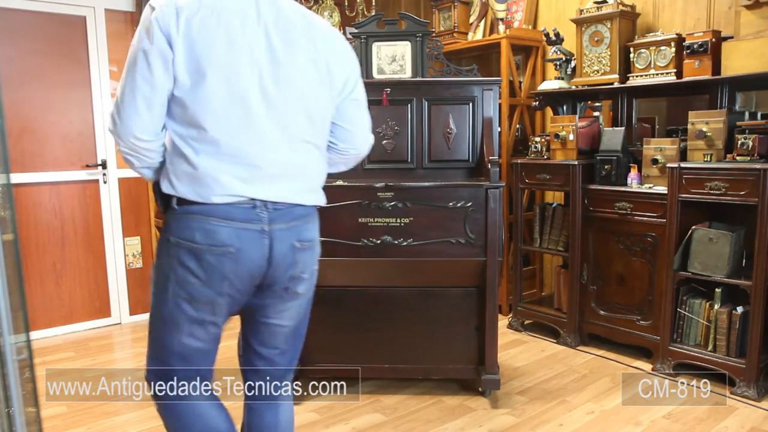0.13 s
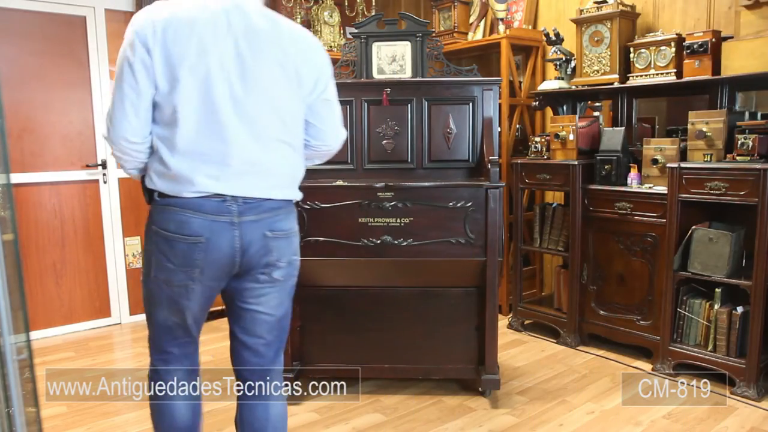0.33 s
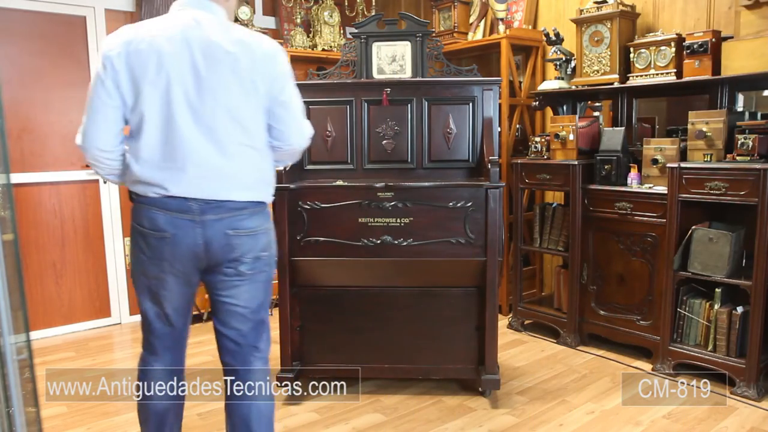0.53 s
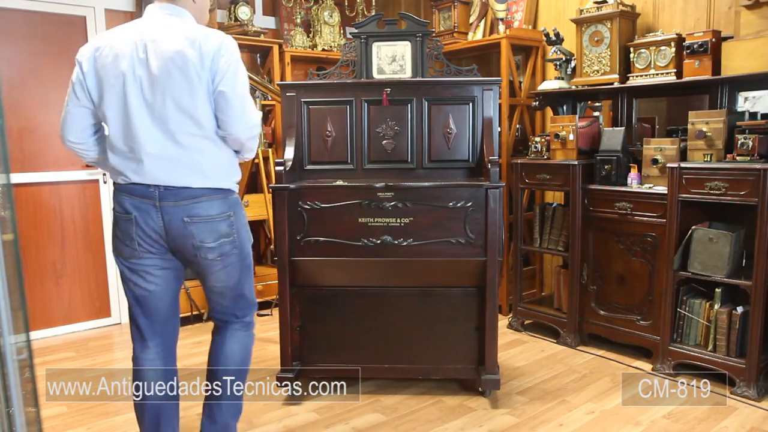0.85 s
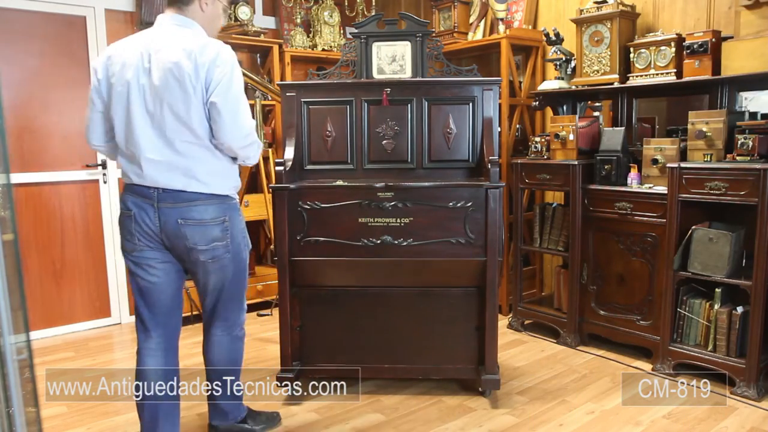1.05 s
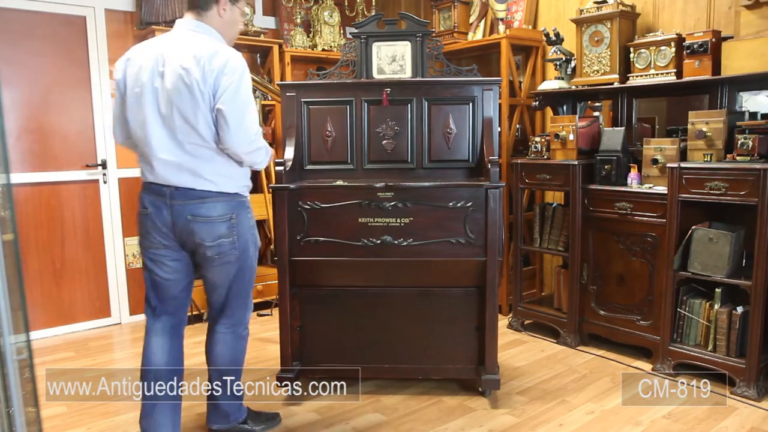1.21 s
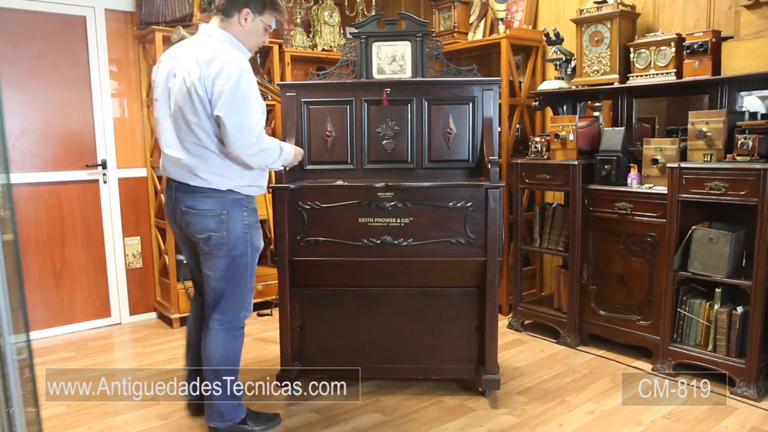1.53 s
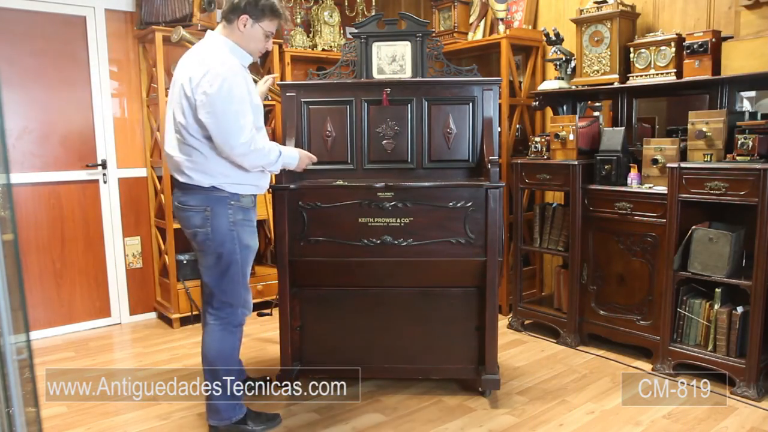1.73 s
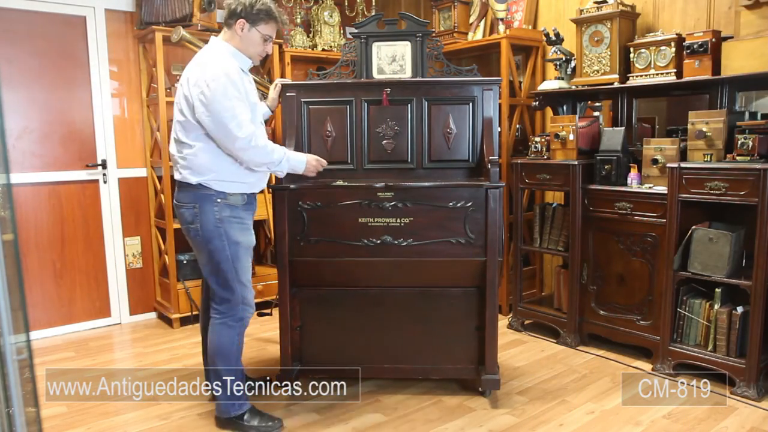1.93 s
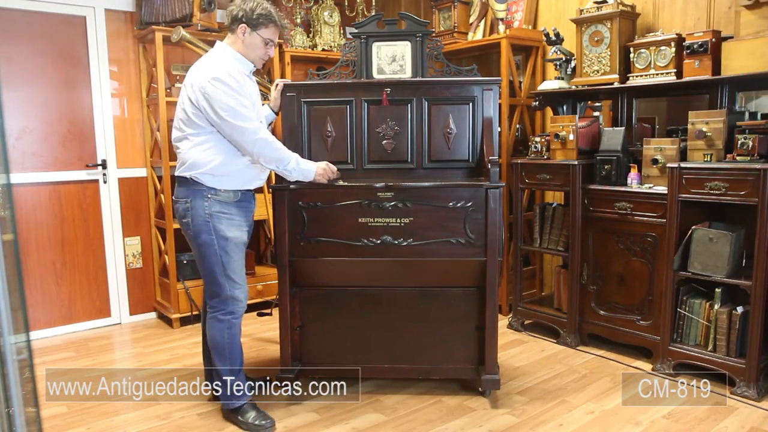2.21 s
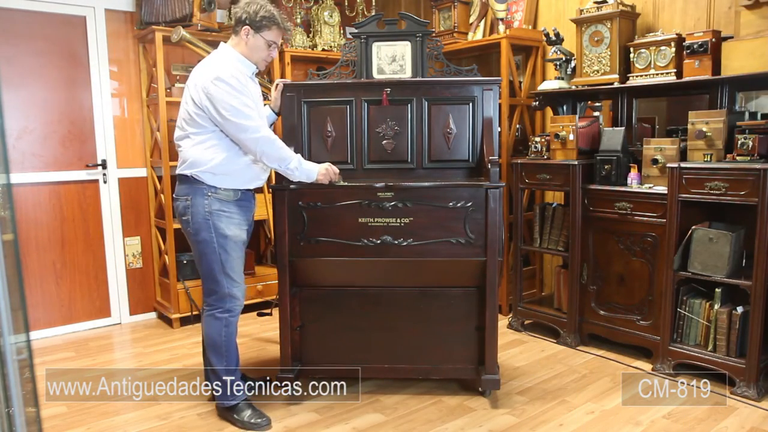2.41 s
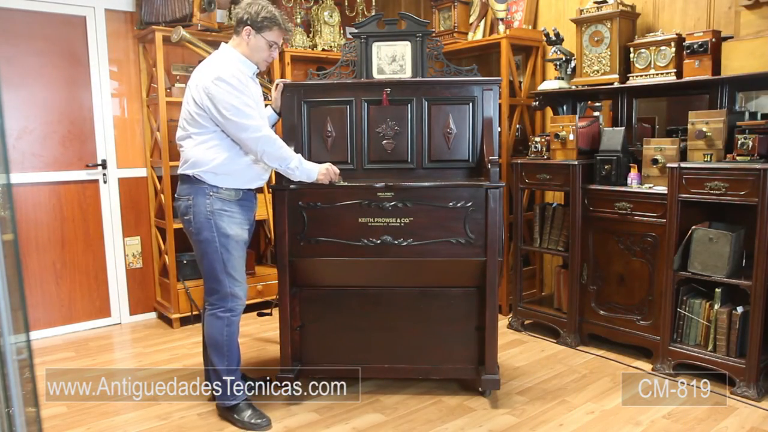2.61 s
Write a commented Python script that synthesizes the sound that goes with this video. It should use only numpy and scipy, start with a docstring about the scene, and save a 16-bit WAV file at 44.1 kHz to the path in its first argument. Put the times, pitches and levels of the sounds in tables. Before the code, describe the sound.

Footsteps on a wooden floor with soft scuffs, then a sharp hand knock on a wooden cabinet

```python
"""A man takes a few soft steps over a wooden floor in a small live room: decaying sines make the thuds,
coloured noise the clacks, scuffs and ticks; a board groans as low modes ring at each slip.
A thin, faint whistle, a narrow noise band, wavers during the first steps. Then his hand knocks on a wooden
cabinet, noise cracks over ringing panels, and something loose in it rattles.
One microphone with a steady noise hiss picks it all up; peaks above full scale clip."""
import sys
import numpy as np
from scipy import signal
from scipy.fft import rfft, irfft, next_fast_len
from scipy.io import wavfile
from scipy.ndimage import map_coordinates

SR = 44100
rng = np.random.default_rng(int(sys.argv[2]) if len(sys.argv) > 2 else 0)


def dump(signal):
    """Clip the signal to [-1, 1] and save it as 16-bit WAV at the path in sys.argv[1]."""
    limited = np.clip(np.atleast_2d(signal).T, -1, 1)
    pcm = np.round(limited * 32767).astype(np.int16)
    wavfile.write(sys.argv[1], SR, pcm)


N = 121275


def amp(db):
    """Decibels to gain."""
    return 10 ** (np.asarray(db) / 20)


def unit(x):
    """Scaled to rms 1."""
    return x / np.sqrt(np.mean(x ** 2) + 1e-20)


def along(points, hz):
    """(Hz, value) points interpolated on a log frequency axis."""
    point_hz, value = np.transpose(points)
    return np.interp(np.log(hz + 1), np.log(point_hz + 1), value)


def since(start_s):
    """Seconds since a moment, zero before it."""
    return np.maximum(np.arange(N) / SR - start_s, 0)


def wobble(knots_per_s):
    """Smooth random curve through normally distributed knots."""
    knots = rng.standard_normal(N // 8)
    return map_coordinates(knots, [np.arange(N) * knots_per_s / SR], mode="wrap")


def filtered(x, response):
    """x times a response of frequency."""
    size = next_fast_len(N + SR // 4)
    return irfft(rfft(x, size) * response(np.fft.rfftfreq(size, 1 / SR)), size)[:N]


def noise(colour_db):
    """Noise of rms 1 with a spectrum given in dB."""
    return unit(filtered(rng.standard_normal(N), lambda hz: amp(colour_db(hz))))


def shelf(hz, corner_hz):
    """Rises from 0 to 1 around the corner."""
    return hz ** 4 / (hz ** 4 + corner_hz ** 4)


def struck(t, t60_s, attack_s=0.00027):
    """Quick rise and exponential decay, 60 dB per t60."""
    decay = np.exp(-np.minimum(np.log(1000) * t / t60_s, 40))
    return (1 - np.exp(-t / attack_s)) * decay


def ring(modes, start_s, scatter_db):
    """Damped modes set going at one moment, levels scattered, cut after half a second."""
    t = since(start_s)
    first = np.searchsorted(t, 0, side="right")
    t = t[first:first + SR // 2]
    out = np.zeros(N)
    for pitch_hz, level_db, t60_s in modes:
        gain = amp(level_db + scatter_db * rng.standard_normal())
        out[first:first + len(t)] += gain * struck(t, t60_s) * np.sin(2 * np.pi * pitch_hz * t)
    return out


ROOM_RISE_S = 0.0041
# reverberation: freq_hz [Hz], t60_s [s]
ROOM_DECAY = [(80, 1), (250, 0.24), (500, 0.44), (1500, 0.66), (3500, 0.62), (6000, 0.46), (12000, 0.33)]


def room(x, wet_db):
    """Adds reverberation: noise decaying at its own rate per frequency, after a soft onset."""
    hz, t, spectrum = signal.stft(rng.standard_normal(SR), SR, nperseg=256)
    decay = np.exp(-np.log(1000) * t / along(ROOM_DECAY, hz)[:, None])
    tail = signal.istft(spectrum * decay, SR, nperseg=256)[1]
    tail *= 1 - np.exp(-(np.arange(len(tail)) / SR / ROOM_RISE_S) ** 2)
    return x + amp(wet_db) * signal.fftconvolve(x, tail / np.linalg.norm(tail))[:N]


# heel and sole pressing on boards: start_s [s], level_db [dB], pitch_hz [Hz], half_peak_s [s, half time to peak]
THUD_EVENTS = [(0.0, -27, 487, 0.0019), (0.061, -32.5, 409, 0.0034), (0.226, -19, 623, 0.0059),
               (0.226, -23, 323, 0.0064), (0.247, -17, 617, 0.0022), (0.300, -31, 367, 0.0032),
               (0.334, -6, 487, 0.0022), (0.340, -10, 280, 0.0015), (0.343, -13, 740, 0.0019),
               (0.525, -22, 334, 0.0029), (0.672, -29, 450, 0.0025), (0.879, -21, 510, .002),
               (0.889, -21.5, 763, 0.0022), (0.907, -24, 446, 0.0038), (0.958, -24, 430, 0.0029),
               (0.991, -28.5, 421, 0.0041), (1.070, -27, 440, 0.0026), (1.458, -15.5, 429, 0.0016),
               (1.459, -27.5, 216, 0.0036), (1.48, -18.5, 468, 0.0023), (1.507, -16, 425, 0.0014),
               (1.531, -19.5, 440, 0.0067), (1.568, -24, 437, 0.0054), (1.594, -4, 447, 0.0012),
               (1.609, -10.5, 375, 0.0013), (1.624, -15, 465, .003), (1.928, -23, 507, .003),
               (1.929, -23.5, 822, 0.0019), (2.25, -30, 464, 0.01)]


def thuds():
    """Each soft landing swells and dies within a few cycles of the boards' pitch."""
    out = np.zeros(N + SR)
    t = np.arange(SR // 10) / SR
    for start_s, level_db, pitch_hz, half_peak_s in THUD_EVENTS:
        u = t / (2 * half_peak_s)
        swell = (u * np.exp(1 - u)) ** 2
        first = max(round(start_s * SR), 0)
        out[first:first + len(t)] += amp(level_db) * swell * np.sin(2 * np.pi * pitch_hz * t)
    return room(out[:N], wet_db=-4.5)


CLACK_T60_S, CLACK_TREBLE_HZ = 0.057, 1520
# shoe meeting floor: start_s [s], level_db [dB], treble_db [dB]
CLACK_EVENTS = [(0.0, -25.5, -4.5), (0.2237, -15.5, -4), (0.8671, -20, -8), (1.0725, -20, -3),
                (2.017, -22, 0.5)]
# clack spectrum: freq_hz [Hz], level_db [dB]
CLACK_SPECTRUM = [(50, -31), (120, -34), (200, -1.5), (400, -3), (750, 4.5), (1000, -12.5), (1250, -1.5),
                  (1700, -4.5), (3200, -2.5), (4500, -12.5), (15000, -58)]


def clacks():
    """The hard edge of a heel gives a short, broad, woody clack: decaying coloured noise."""
    out = np.zeros(N)
    for start_s, level_db, treble_db in CLACK_EVENTS:
        burst = noise(lambda hz: along(CLACK_SPECTRUM, hz) + treble_db * shelf(hz, CLACK_TREBLE_HZ))
        out += amp(level_db) * struck(since(start_s), CLACK_T60_S) * burst
    return room(out, wet_db=1.5)


STROKE_POWER = 1.36  # above 1: gentler start and end
BASS_HZ, TREBLE_HZ = 1230, 5940
RASP_HZ, RASP_OCTAVES = 1360, 0.87
GRAIN_PER_S, GRAIN_DB, DRAG_PER_S, DRAG_DB = 900, 0.5, 65, 1.07  # fine and slow friction unevenness
UNEVENNESS_LIMIT_SD = 1.9  # upper limit of the friction unevenness, in standard deviations
# shoes and trousers sliding: start_s, rise_s, hold_s, fall_s [s], level_db, bass_db, rasp_db, treble_db [dB]
SCUFF_EVENTS = [(-0.1, 0.021, 0.077, 0.6, -35, 10, -7, 5.5),
                (0.218, 0.082, 0.02, 0.04, -17.5, 6, -4.5, -0.5),
                (0.315, 0.015, 0.043, 0.12, -16.5, -5.5, 0.5, -0.5),
                (0.416, 0.043, 0.066, 0.31, -33.5, 13.5, 1.5, 7.5),
                (0.851, 0.053, .13, 0.092, -25, -1.5, -0.5, 5), (1.073, 0.16, 0.061, 0.45, -40.5, 7, 7, 8),
                (1.469, 0.058, 0.043, 0.086, -19.5, -3.5, -4, -0.5),
                (1.581, 0.05, 0.019, 0.11, -17, -2.5, 5.5, 4),
                (1.746, 0.1, 0.11, 0.22, -26.5, 1.5, 1.5, 6.5), (2.088, 0.11, 0.09, 0.036, -33, 5.5, 4, 14)]
# scuff spectrum: freq_hz [Hz], level_db [dB]
SCUFF_SPECTRUM = [(30, -63), (110, -20), (200, -4.5), (450, 0.5), (650, -2), (1150, -4), (1700, -5),
                  (2400, -2), (3050, 2.5), (3550, 2.5), (4200, -3), (5500, -9.5), (8000, -15), (11000, -22),
                  (15500, -34)]


def scuffs():
    """Grainy friction noise under a rise, hold and fall, coloured anew for each stroke."""
    t, out = np.arange(N) / SR, np.zeros(N)
    for start_s, rise_s, hold_s, fall_s, level_db, bass_db, rasp_db, treble_db in SCUFF_EVENTS:
        corners_s = start_s + np.cumsum([0, rise_s, hold_s, fall_s])
        stroke = np.interp(t, corners_s, [0, 1, 1, 0]) ** STROKE_POWER

        def colour_db(hz):
            rasp = np.exp(-0.5 * (np.log2((hz + 1) / RASP_HZ) / RASP_OCTAVES) ** 2)
            bass = 1 - shelf(hz, BASS_HZ)
            tilt_db = bass_db * bass + rasp_db * rasp + treble_db * shelf(hz, TREBLE_HZ)
            return along(SCUFF_SPECTRUM, hz) + tilt_db

        out += amp(level_db) * stroke * noise(colour_db)
    fine_db = GRAIN_DB * np.minimum(wobble(GRAIN_PER_S), UNEVENNESS_LIMIT_SD)
    slow_db = DRAG_DB * np.minimum(wobble(DRAG_PER_S), UNEVENNESS_LIMIT_SD)
    return room(out * unit(amp(fine_db + slow_db)), wet_db=-5)


TICK_T60_S = 0.027
ECHO_DB, ECHO_T60_S, ECHO_DULL_DB = -20, 0.86, 6
# sharp ticks of shoe and boards: start_s [s], level_db [dB]
TICK_EVENTS = [(0.3445, -5.5), (0.3458, -7), (0.6724, -17.5), (0.909, -24.5), (0.9635, -20), (1.071, -22.5)]
# tick spectrum: freq_hz [Hz], level_db [dB]
TICK_SPECTRUM = [(100, -49), (800, -9), (1600, -5.5), (2600, -5.5), (3600, 6), (4700, -3), (6000, -8),
                 (9000, -15), (15000, -34)]


def ticks():
    """Short bright noise cracks as the weight rolls over the shoe, each with a diffuse, duller echo."""
    bursts = sum(amp(level_db) * struck(since(start_s), TICK_T60_S) for start_s, level_db in TICK_EVENTS)
    echoes = sum(amp(level_db + ECHO_DB) * struck(since(start_s), ECHO_T60_S, ROOM_RISE_S)
                 for start_s, level_db in TICK_EVENTS)
    bright = noise(lambda hz: along(TICK_SPECTRUM, hz))
    dull = noise(lambda hz: along(TICK_SPECTRUM, hz) - ECHO_DULL_DB * shelf(hz, TREBLE_HZ))
    return bursts * bright + echoes * dull


# slips of the groaning board: start_s [s], level_db [dB]
SLIP_EVENTS = [(1.838, -25), (1.849, -15), (1.862, -19), (1.880, -18), (1.892, -22.5)]
# board modes: pitch_hz [Hz], level_db [dB], t60_s [s]
BOARD_MODES = [(72.6, -34, 0.12), (93, -9.5, 0.17), (165, -5.5, 0.15), (214, -1.5, 0.087), (337, -37, 0.07)]


def groan():
    """A board gives way in a few slips, each ringing its low modes."""
    slips = sum(amp(level_db) * ring(BOARD_MODES, start_s, scatter_db=2.5)
                for start_s, level_db in SLIP_EVENTS)
    return room(-slips, wet_db=-3)


KNOCK_T60_S, KNOCK_TREBLE_HZ = 0.04, 2500
PANELS_DB = -8.5  # relative to the first blow
LATCH_HZ, LATCH_DB, LATCH_T60_S = 8950, -32, 0.05
# hand on the cabinet, then the rattle: start_s [s], level_db [dB], treble_db [dB]
KNOCK_EVENTS = [(2.3058, -5, -5), (2.34, -12.5, 25), (2.3509, -11, -1), (2.37, -12.5, 4), (2.4484, -10, 2)]
# knock spectrum: freq_hz [Hz], level_db [dB]
KNOCK_SPECTRUM = [(60, -42), (160, -16), (250, -4.5), (600, -14), (1100, -1.5), (1700, -7), (2250, -5.5),
                  (2700, -6), (3300, 0), (4000, -10), (4600, -24), (6000, -34.5), (9000, -54), (15000, -55)]
# cabinet modes: pitch_hz [Hz], level_db [dB], t60_s [s]
CABINET_MODES = [(240, -12, 0.28), (464, -10, 0.45), (872, -5, 0.33), (1164, -1.5, 0.15),
                 (1450, -10.5, 0.3), (1820, -29, 0.62), (2144, -19, 0.29), (2260, 11, 0.031),
                 (3107, -31, .3), (3210, -21, .4), (3505, -16.5, 0.42)]


def cabinet():
    """Each contact is a woody noise crack; the first blow rings the panels, the second pings a latch."""
    cracks = np.zeros(N)
    for start_s, level_db, treble_db in KNOCK_EVENTS:
        burst = noise(lambda hz: along(KNOCK_SPECTRUM, hz) + treble_db * shelf(hz, KNOCK_TREBLE_HZ))
        cracks += amp(level_db) * struck(since(start_s), KNOCK_T60_S) * burst
    (blow_s, blow_db, _), (rattle_s, _, _), *_ = KNOCK_EVENTS
    panels = amp(PANELS_DB + blow_db) * ring(CABINET_MODES, blow_s, scatter_db=4.5)
    latch = ring([(LATCH_HZ, LATCH_DB, LATCH_T60_S)], rattle_s, scatter_db=2)
    return room(cracks + latch, wet_db=-5) + room(panels, wet_db=-11.5)


WHISTLE_KNOTS_PER_S = 170  # faster knots widen the band
# thin whistle: time_s [s], pitch_hz [Hz], level_db [dB]
WHISTLE_PATH = [(0.05, 3450, -54.5), (0.19, 3292, -38), (0.3, 3100, -47.5), (0.499, 2947, -40.5),
                (0.601, 2834, -43.5), (0.658, 2496, -41), (0.731, 2550, -48), (0.81, 2646, -41),
                (0.864, 2470, -48), (0.899, 2500, -60)]


def whistle():
    """A narrow, unsteady band of noise that sinks in pitch: a carrier with random quadrature levels."""
    time_s, pitch_hz, level_db = np.transpose(WHISTLE_PATH)
    t = np.arange(N) / SR
    phase = 2 * np.pi * np.cumsum(np.interp(t, time_s, pitch_hz)) / SR
    sine = wobble(WHISTLE_KNOTS_PER_S) * np.sin(phase)
    cosine = wobble(WHISTLE_KNOTS_PER_S) * np.cos(phase)
    gain = amp(np.interp(t, time_s, level_db, right=-np.inf))
    return room(unit(sine + cosine) * gain, wet_db=3)


HISS_DB = -39.5
# hiss spectrum: freq_hz [Hz], level_db [dB]
HISS_SPECTRUM = [(24, -33), (40, 1), (54, -6), (132, -2), (333, -6), (535, -4), (606, -14), (778, -6.5),
                 (949, -12), (1250, -10), (1860, -15.5), (15500, -25.5)]


def hiss():
    """Steady room tone and microphone hiss: coloured noise with little deep bass."""
    return amp(HISS_DB) * noise(lambda hz: along(HISS_SPECTRUM, hz) - 25 * (1 - shelf(hz, corner_hz=38)))


def scene():
    """Everything reaches one microphone, the same in both channels."""
    steps = thuds() + clacks() + scuffs() + ticks()
    mono = steps + groan() + cabinet() + whistle() + hiss()
    return np.array([mono, mono])


CLIP_LEVEL, TOP_HZ = 1.0, 15800


def record(dry):
    """The recorder clips at full scale and keeps nothing above its band limit."""
    clipped = np.clip(dry, -CLIP_LEVEL, CLIP_LEVEL)
    return np.array([filtered(x, lambda hz: hz < TOP_HZ) for x in clipped])


dry = scene()
out = record(dry)
dump(out)
```